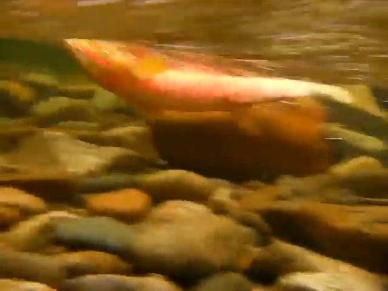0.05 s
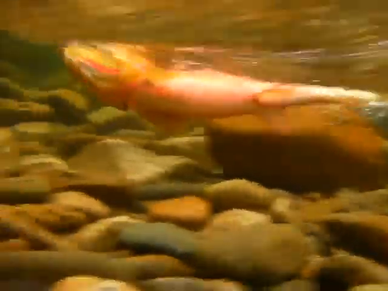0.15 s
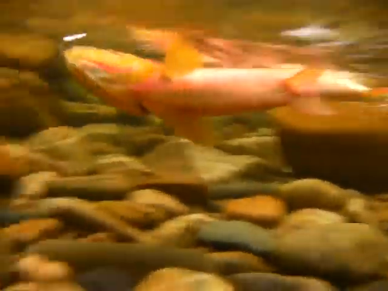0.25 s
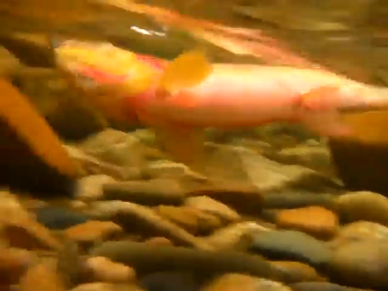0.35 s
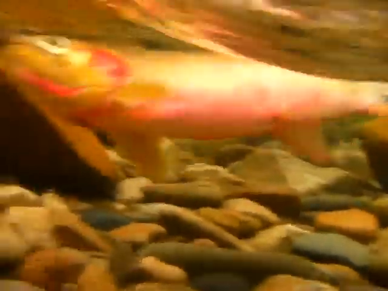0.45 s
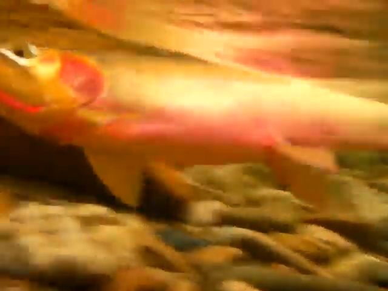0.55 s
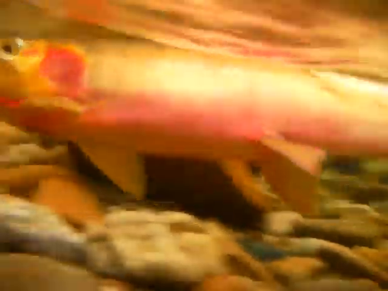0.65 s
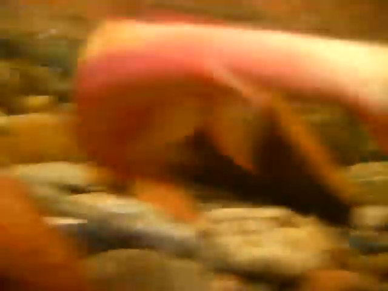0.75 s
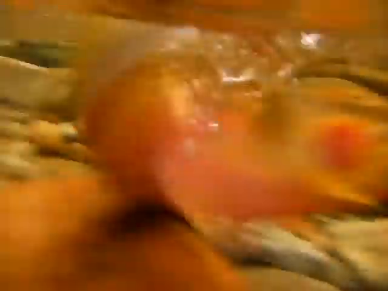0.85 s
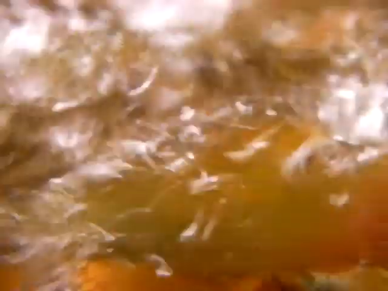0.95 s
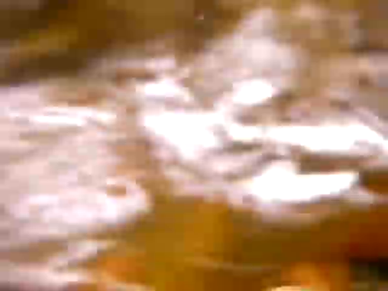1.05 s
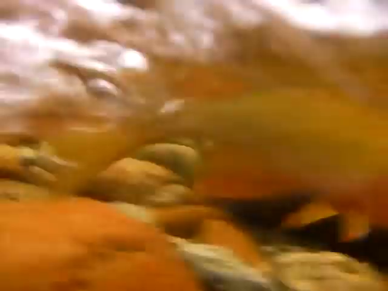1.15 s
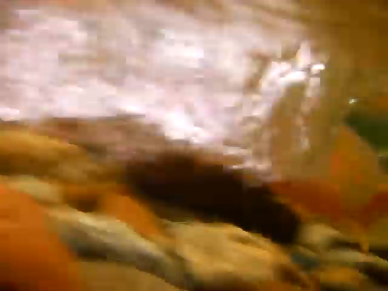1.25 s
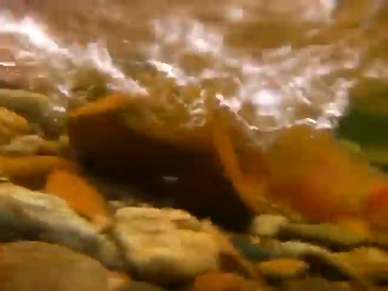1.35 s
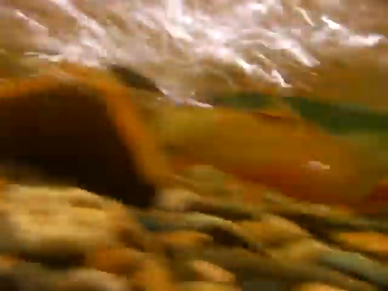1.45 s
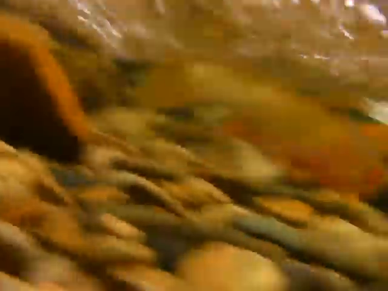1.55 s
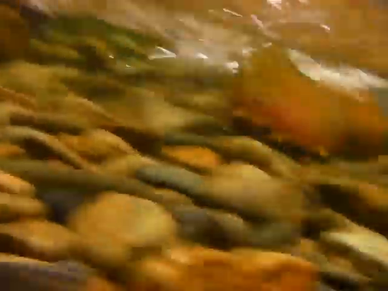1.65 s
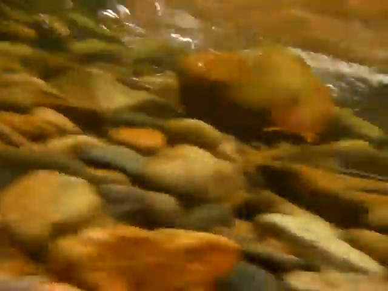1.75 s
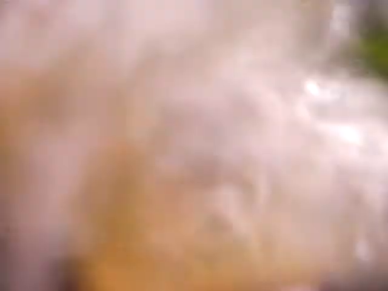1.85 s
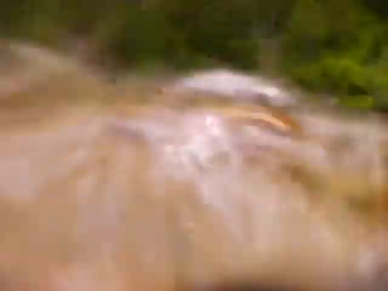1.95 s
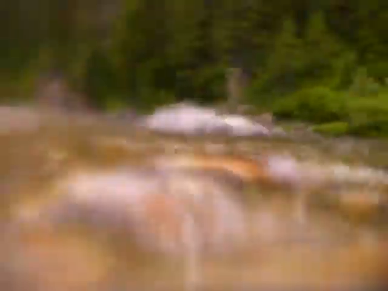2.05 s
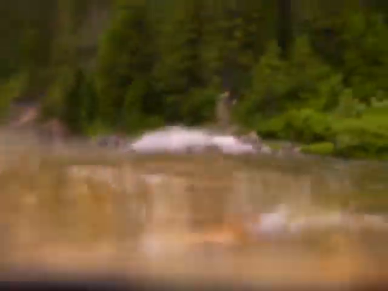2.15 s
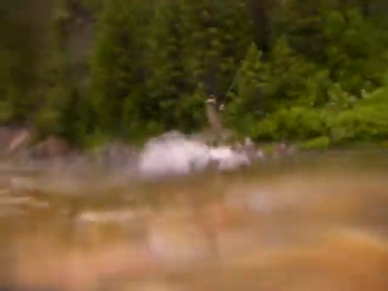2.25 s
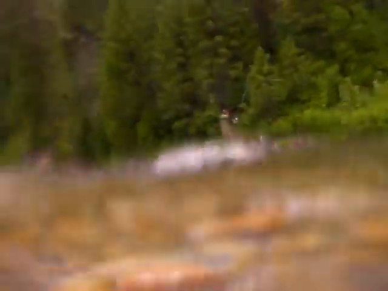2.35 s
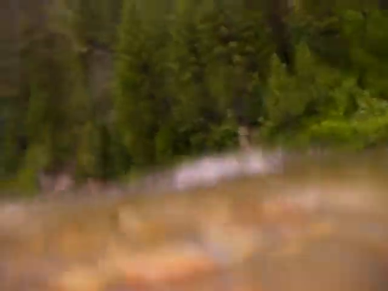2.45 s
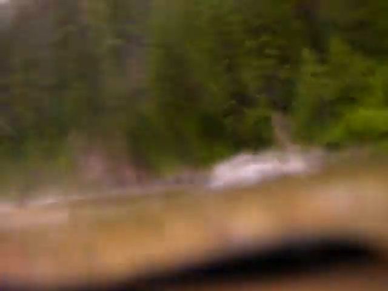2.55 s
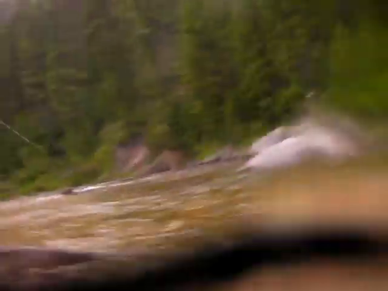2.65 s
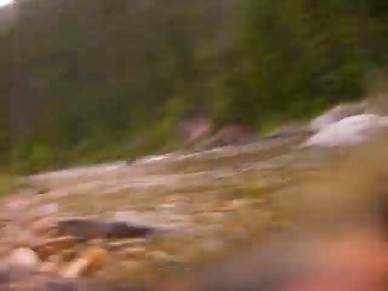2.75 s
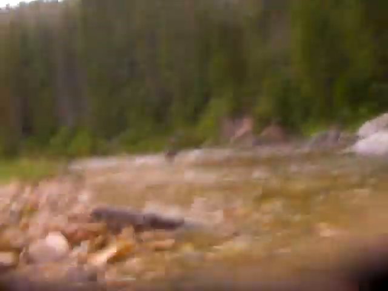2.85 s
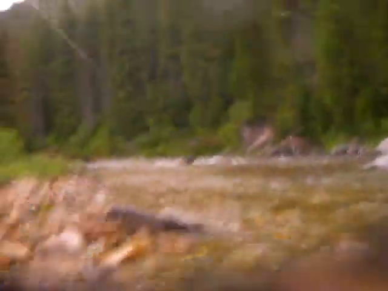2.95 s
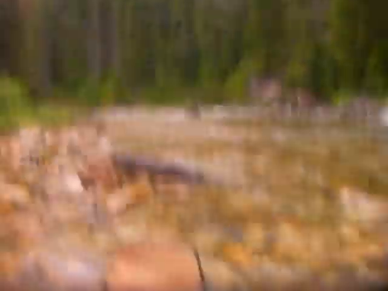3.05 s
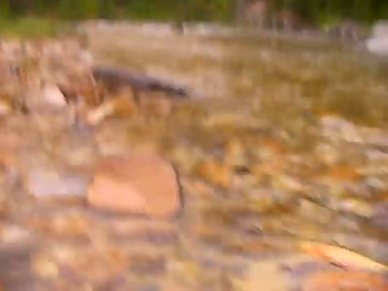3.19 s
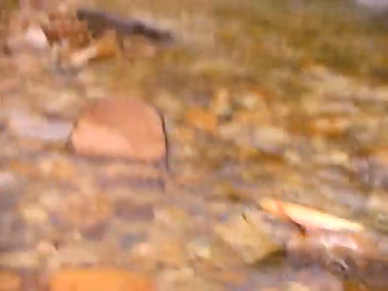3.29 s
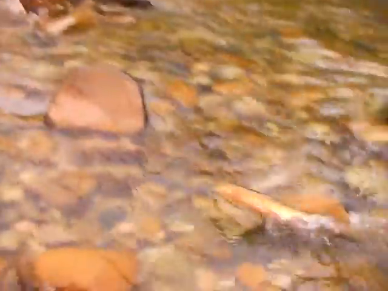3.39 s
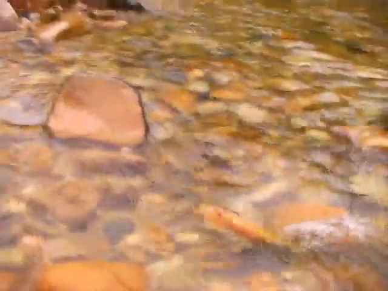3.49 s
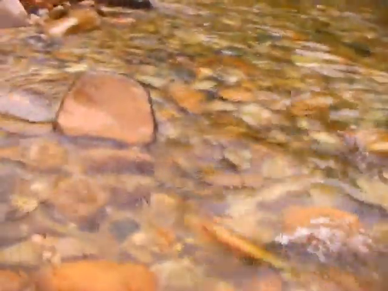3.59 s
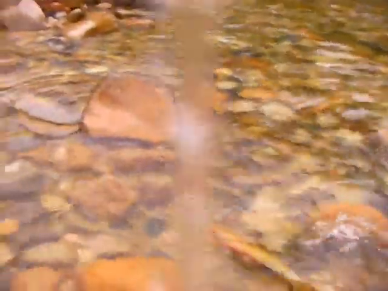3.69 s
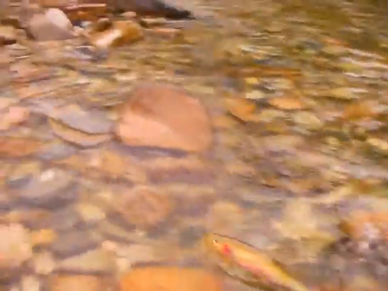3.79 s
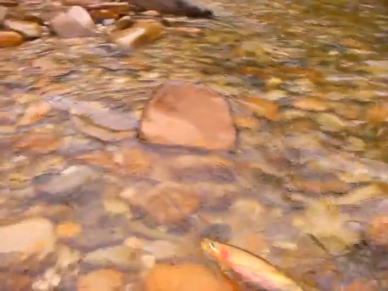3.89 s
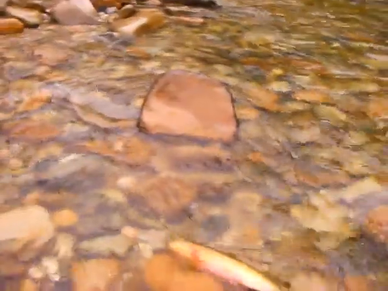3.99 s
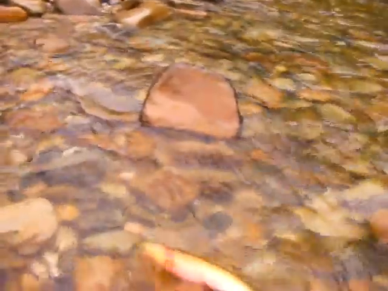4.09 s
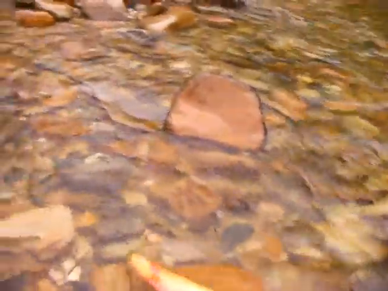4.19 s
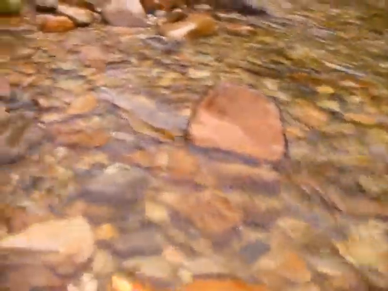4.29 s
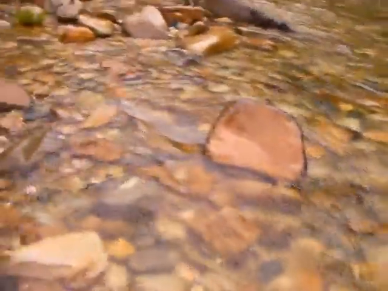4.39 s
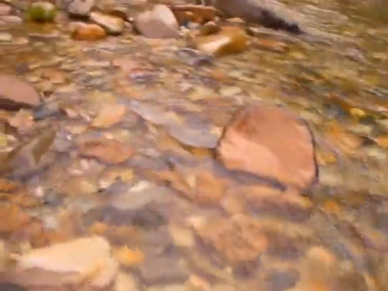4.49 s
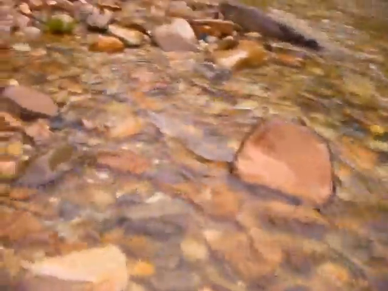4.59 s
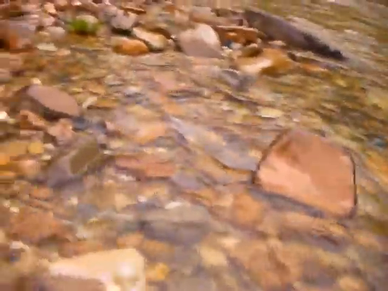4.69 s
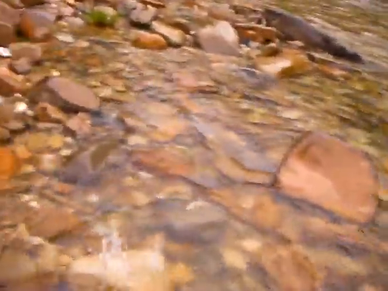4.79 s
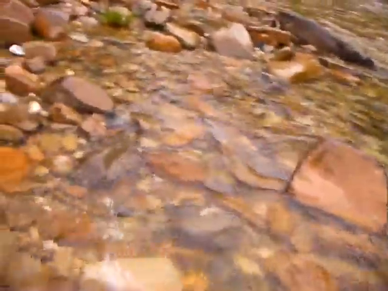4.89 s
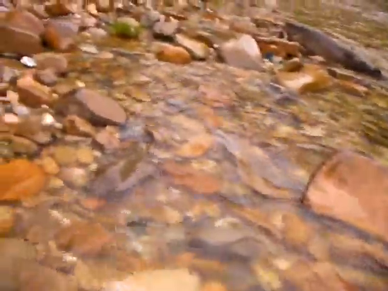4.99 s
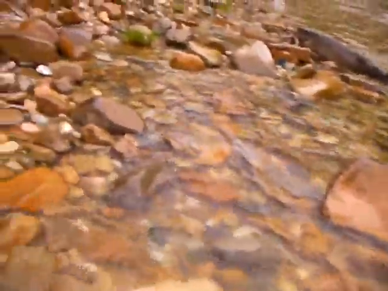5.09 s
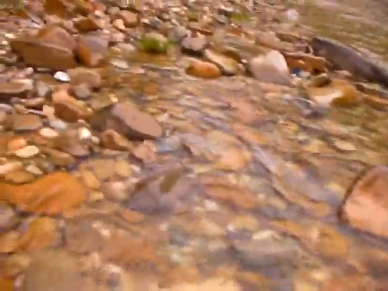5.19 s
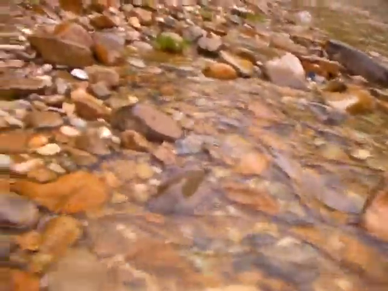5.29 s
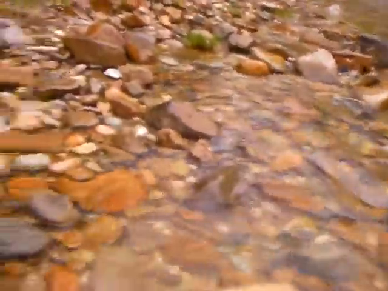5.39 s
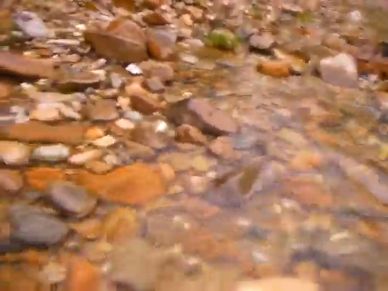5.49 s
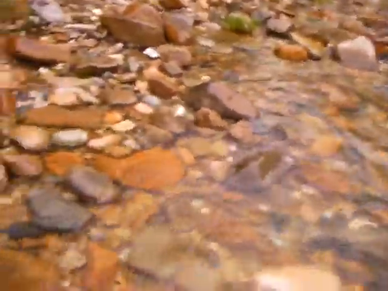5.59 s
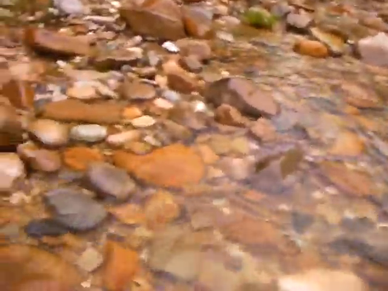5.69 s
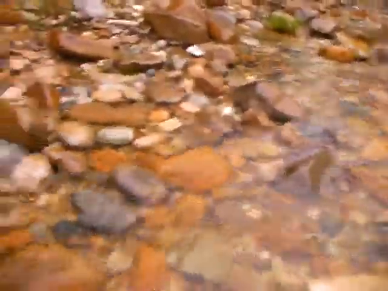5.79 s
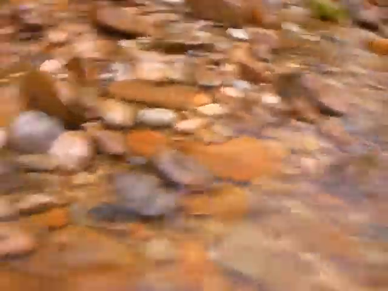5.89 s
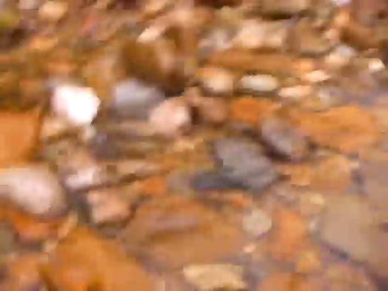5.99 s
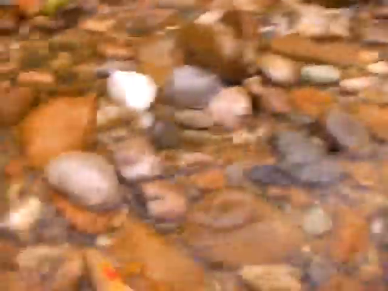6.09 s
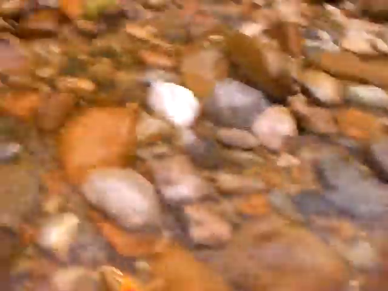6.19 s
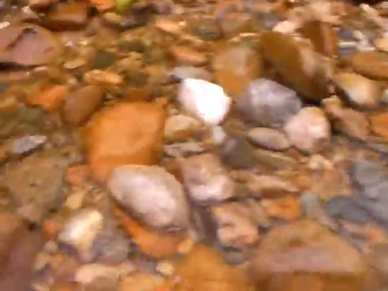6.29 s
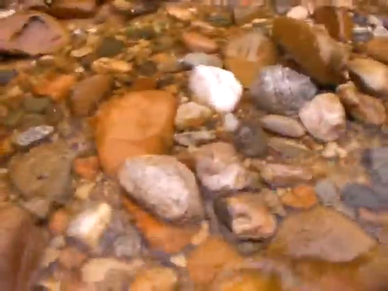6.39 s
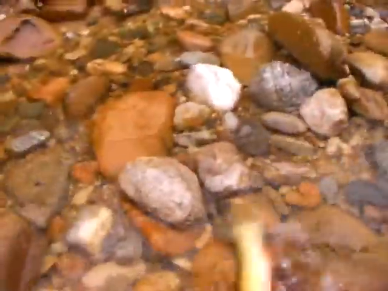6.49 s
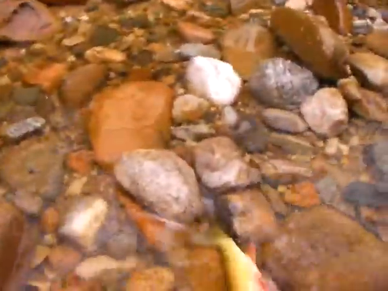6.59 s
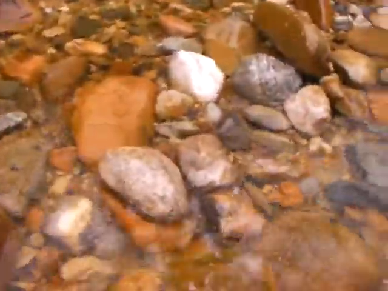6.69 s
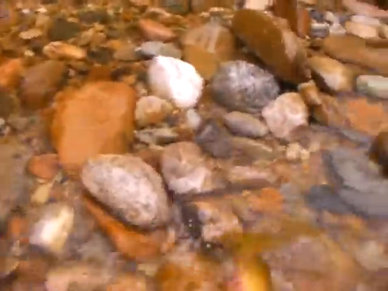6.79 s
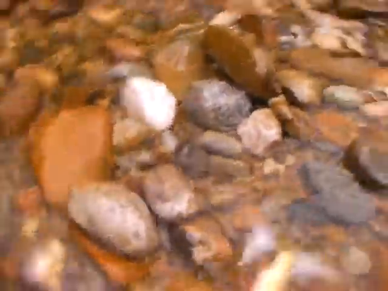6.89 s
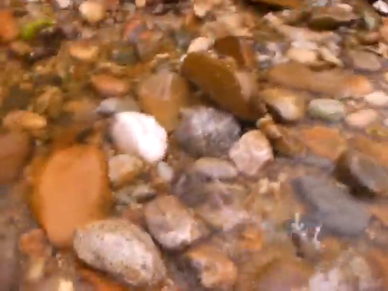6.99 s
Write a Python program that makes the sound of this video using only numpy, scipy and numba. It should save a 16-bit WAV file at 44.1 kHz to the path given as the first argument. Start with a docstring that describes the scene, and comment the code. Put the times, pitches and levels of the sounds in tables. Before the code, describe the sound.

From 0 to about 1.9 seconds the microphone is submerged in a shallow gravel creek. Loud, irregular hollow gulps near 500 Hz come many times a second, with low thumps on the case, booming bubbles and short rising blips; the water grows rougher and more crackly after 1 second, with a hard burst near 1.1 and dense glugging until 1.85. Then it drops abruptly to almost nothing. From 2.0 to 2.3 a faint muffled gurgle surfaces into a quiet, steady riffle. Between 2.3 and 3.7 the left side sweeps from dull and resonant to bright and hissy; the right stays muffled. Drips tick at 2.7 and 3.2, bubbles plop around 3.3, and a bump and brief dip come near 3.6. Gentle wavelets wash over stones around 4 to 4.8, then ease. From 6.0 to 7.1 closer splashes, short gurgles, plops and crisp droplets return over the trickling.

```python
"""Creek, from under water to air

A small waterproof camera sits under a shallow gravel creek, then is lifted out and held over the riffle.
Submerged, a trapped air pocket gulps and thumps near 500 Hz among a booming swarm of bubbles.
In air the left microphone port drains: its resonant low-pass slides up until the hiss of spray comes through.
The right port stays wet, a fixed low-pass that passes only a dull babble."""
import sys
import numpy as np
from scipy import signal
from scipy.fft import rfft, irfft
from scipy.io import wavfile
from scipy.ndimage import uniform_filter1d
from numba import njit

SR = 44100
rng = np.random.default_rng(int(sys.argv[2]) if len(sys.argv) > 2 else 0)


def persist_wave(psi):
    """Save psi, clipped to +-1, as 16-bit WAV."""
    counts = np.round(np.clip(psi, -1, 1) * 32767).astype(np.int16)
    wavfile.write(sys.argv[1], SR, np.atleast_2d(counts).T)


N = 310625
TIME = np.arange(N) / SR

# strength of the current on the submerged case: (time [s], level [dB])
CURRENT = [(0, -22.5), (.26, -22), (.58, -15.5), (.82, -15.5), (.93, -28), (.99, -14), (1.17, -18),
           (1.43, -7), (1.6, -12), (1.84, -18), (1.92, -39.5)]
# largest air pocket as it swells and shrinks: (time [s], resonance [Hz], thump on the case [dB])
AIR_POCKET = [(0, 555, -17.5), (.95, 475, -15.5), (1.28, 464, -8.5), (1.46, 294, -31), (1.57, 402, -47),
              (1.72, 490, -10.5), (1.87, 514, -17.5)]

EMERGING_S, UNDER_END_S = CURRENT[-2][0], CURRENT[-1][0]
SURFACE_S, DRY_S = 2.304, 3.7  # ports at the surface; last film gone from the left port


def undb(db):
    """Decibels to gain."""
    return 10 ** (np.asarray(db) / 20)


def unit(x):
    """Scale to rms 1."""
    return x / np.sqrt(np.mean(x ** 2))


def curves(table):
    """Each column of a table as a line through time."""
    s, *columns = np.transpose(table)
    return [np.interp(TIME, s, c) for c in columns]


def colour(x, points):
    """Minimum-phase filter with the given (Hz, dB) response, made by folding the cepstrum."""
    hz, db = np.transpose(points)
    size = 4096
    bin_hz = np.arange(size // 2 + 1) * SR / size
    bin_db = np.interp(np.log(bin_hz + 1), np.log(hz), db)
    cepstrum = irfft(np.log(undb(bin_db)))
    cepstrum[1:size // 2] *= 2
    cepstrum[size // 2 + 1:] = 0
    return signal.fftconvolve(x, irfft(np.exp(rfft(cepstrum))))[:N]


def walk(rate_hz):
    """Random levels 1 / rate_hz apart, joined by ramps; rms 1."""
    k = max(int(SR / rate_hz), 2)
    held = np.repeat(rng.standard_normal(N // k + 1), k)[:N]
    return unit(uniform_filter1d(held, k))


def add(track, s, sound):
    """Mix a sound into a track at time s."""
    start = max(int(s * SR), 0)
    track[..., start:start + sound.shape[-1]] += sound[..., :N - start]


def sine(hz):
    """A sine that follows a moving pitch."""
    return np.sin(2 * np.pi * np.cumsum(hz) / SR)


@njit
def port(x, hz, width, leak):
    """A film of water on a port: a resonant low-pass, with some treble leaking past it."""
    y, band_state, low_state = np.empty(len(x)), 0., 0.
    for i in range(len(x)):
        g, k = np.tan(np.pi * hz[i] / SR), width[i]
        band = (band_state + g * (x[i] - low_state)) / (1 + g * (g + k))
        low = low_state + g * band
        band_state, low_state = 2 * band - band_state, 2 * low - low_state
        high = x[i] - k * band - low
        y[i] = low - leak[i] * high
    return y


@njit
def ring(starts, hz, cycles, sizes, glide):
    """Sines that swell for a moment, then die away as their pitch rises."""
    y = np.zeros(N)
    for j in range(len(starts)):
        n = int(cycles[j] * SR / hz[j]) + 2
        w = 2 * np.pi * hz[j] / SR
        z, step, bend = sizes[j] + 0j, np.exp(1j * w - 8 / n), np.exp(1j * w * glide / n)
        for i in range(min(n, N - starts[j])):
            y[starts[j] + i] += z.imag * min(6 * i / n, 1.) ** 2
            z *= step
            step *= bend
    return y


def bubbles(per_s, low_hz, high_hz, cycles, spread_db, glide):
    """A swarm of ringing bubbles, many small and a few big, spread between two pitches; rms 1."""
    when, pitch, damping, size = rng.random((int(per_s * N / SR), 4)).T
    hz = low_hz * (high_hz / low_hz) ** pitch
    sizes = undb(-spread_db * np.log(size + .01)) * hz
    starts = (when * N).astype(np.int64)
    return unit(ring(starts, hz, cycles * (.5 + damping), sizes, float(glide)))


def gulps(attack_s=0.0034, hold_s=0.00574, t60_s=.036, waver=0.0442, flutter_db=3.5, twist_rad=0.38,
          crackle_db=3, froth=0.35, gulp_db=-.5, thump_apart=0.26,
          tear_rise_s=0.0058, tear_fall_s=0.0059, tear_lag_s=0.0036):
    """The air pocket rings each time the current shakes it, thumps the case and crackles as it tears."""
    # crackle spectrum: (frequency [Hz], level [dB])
    crackle_response = [(300, -25.5), (900, 7.5), (1400, 7), (2200, -5.5), (4000, -12.5), (6500, -18.5),
                        (9000, -21), (16000, -39.5)]
    thump_response = [(20, -9), (60, 8), (110, 10.5), (200, -17), (300, -16.5), (900, -61.5)]
    # the tiny floor rests the pitch at 500 Hz
    shake, shake_hz, tear = np.full(N, 1e-12), np.full(N, 500e-12), np.zeros(N)
    t = np.arange(SR // 8) / SR
    attack = np.sin(np.minimum(t / attack_s, 1) * np.pi / 2) ** 2
    swell = attack * undb(-60 * np.maximum(t - hold_s, 0) / t60_s)
    for s, db, hz, crack_db in gulp_train():
        power = (undb(db) * swell) ** 2
        add(shake, s - attack_s / 2, power)
        add(shake_hz, s - attack_s / 2, power * hz)
        start = max(s - .04, 0)
        age = t + start - s - tear_lag_s
        add(tear, start, undb(crack_db) * np.exp(np.minimum(age / tear_rise_s, -age / tear_fall_s)))
    # one pocket: overlapping gulps pull the same note, at a slightly different phase per port
    phase = 2 * np.pi * np.cumsum(shake_hz / shake * (1 + waver * walk(170))) / SR
    note = np.array([undb(gulp_db + flutter_db * walk(110)) * np.sin(phase + twist_rad * walk(60))
                     for _ in range(2)])
    thump_db = curves(AIR_POCKET)[1]
    push = rng.standard_normal(N) + thump_apart * rng.standard_normal((2, N))
    thump = np.array([unit(colour(p, thump_response)) for p in push])
    crackle = []
    for _ in range(2):
        grains = bubbles(2500, 330, 14000, 0.8, 3.5, 0) + froth * rng.standard_normal(N)
        crackle.append(unit(colour(grains, crackle_response)))
    return np.sqrt(shake) * (note + undb(thump_db) * thump) + undb(crackle_db) * tear * np.array(crackle)


def gulp_train(gap_s=0.017, fade_db=1.5, scatter=.04):
    """Every gulp (s, dB, Hz, crackle dB); within a run each is weaker, its pitch a little off the first."""
    # runs of gulps: (time [s], gulps in the run, level [dB], pitch [Hz], crackle [dB])
    runs = [(0.0, 2, -6, 545, -30), (0.057, 1, -1.5, 524, -28.5), (.118, 2, -7, 546, -69),
            (.214, 1, -2.5, 548, -49.5), (.324, 1, -8, 493, -63), (.388, 1, -12.5, 497.2, -65),
            (.416, 1, -7, 515, -45), (0.436, 1, 2, 489, -33), (0.495, 2, -10.5, 520, -60),
            (.6, 1, -3, 541.5, -29), (0.617, 1, -1, 625, -36), (.727, 1, 0.5, 483, -28.5),
            (0.786, 1, -1, 515, -20.5), (0.878, 1, 0.5, 543, -20), (.954, 1, -5.5, 540, -49.5),
            (0.987, 2, -4.5, 429.7, -29.5), (1.031, 1, -2.5, 466, -26), (1.061, 2, -4.5, 548.3, -25),
            (1.104, 1, 0.5, 489.4, -11.5), (1.128, 1, -4, 528.6, -23), (1.179, 1, -10, 447, -49),
            (1.205, 3, -1.5, 515, -24), (1.322, 1, -8, 398.4, -16.5), (1.355, 4, 0, 445, -22),
            (1.457, 1, -9, 470.2, -34), (1.515, 2, -1, 525, -22), (1.563, 3, -1.5, 450, -28),
            (1.633, 2, -1.5, 430, -25), (1.693, 2, -5, 500, -27), (1.774, 2, -2.5, 510, -25),
            (1.833, 1, -10, 482, -25)]
    for s, count, db, hz, crack_db in runs:
        for k, chance in enumerate(rng.standard_normal(8)[:round(count)]):
            gulp_hz = hz * (1 + scatter * chance * min(k, 1))
            yield s + k * gap_s, db - k * fade_db, gulp_hz, crack_db - k * fade_db


def churn(churn_db=-5.5, apart_db=-7, pocket_width=0.27, chirp_db=-27, case_hz=190, case_db=-42, surge_db=4.5):
    """The current tumbles over the case: a swarm of bubbles booms in the moving pocket, the case rings low."""
    # underwater swarm spectrum: (frequency [Hz], level [dB])
    submerged = [(25, -18.5), (90, -2.5), (190, 2), (255, -17.5), (400, 4.5), (600, 2.5), (820, -9),
                 (1300, -8), (1900, -23), (3500, -20.5), (8000, -36), (16000, -64.5)]
    level_db = curves(CURRENT + [(2.05, -102.5)])[0] + surge_db * surges()
    pocket_hz, steady = curves(AIR_POCKET)[0], np.ones(N)
    swarms = []
    for _ in range(2):
        swarm = bubbles(800, 150, 2400, 18, 2.8, .2) + .6 * rng.standard_normal(N)
        swarms.append(unit(port(colour(swarm, submerged), pocket_hz, pocket_width * steady, steady)))
    mid, side = swarms
    boom = undb(churn_db) * (mid + undb(apart_db) * side * np.array([[1], [-1]]))
    chirps = bubbles(40, 800, 1500, 40, 2.0, .25)
    case_response = [(case_hz / 2, -30), (case_hz * .88, -12), (case_hz, 0), (case_hz * 1.14, -14),
                     (case_hz * 2, -60), (case_hz * 8, -100)]
    hum = unit(colour(rng.standard_normal(N), case_response))
    under = np.clip((1.9 - TIME) * 10, 0, 1)
    return undb(level_db) * (boom + undb(chirp_db) * chirps) + undb(case_db) * hum * under


def surges(width_s=0.027):
    """Nearness to a gulp, 0-1: the churning swells round every gulp and slackens between them."""
    near, t = np.zeros(N), np.arange(-SR // 10, SR // 10) / SR
    for s, db, _, _ in gulp_train():
        bump = undb(db) * np.exp(-(t / width_s) ** 2)
        add(near, s + t[0], bump[t >= -s])
    return np.tanh(near)


def single_bubbles(attack=0.11, rise_octaves=0.11):
    """Big bubbles pinch off, each with a short rising note; attack and rise are per t60."""
    # biggest bubbles: (time [s], level [dB], starting pitch [Hz], t60 [s], left minus right [dB])
    big = [(.203, -16.5, 1204, 0.024, 16), (.242, -31.5, 1410, 0.02, 15.5), (.413, -25.5, 1820, 0.02, 13),
           (0.501, -11, 910, 0.037, 2), (0.52, -16.5, 1080, 0.062, 8), (.552, -8, 1280, 0.022, 14),
           (.68, -27, 1750, 0.025, 9), (1.058, -8, 860, 0.026, 2), (1.102, -12, 2330, .013, 8),
           (1.287, -15, 1273, 0.027, 12), (1.308, -11, 1350, 0.024, 14), (1.667, -14.5, 1257, .024, 6),
           (2.115, -25, 1070, 0.02, 9), (2.265, -27.5, 600, 0.045, 0), (3.226, -16.5, 883, 0.017, -12),
           (3.303, -9.5, 795, 0.021, -14.5), (3.584, -15.5, 430, 0.013, 31.5),
           (4.236, -19.5, 464, 0.05, -1), (4.551, -20.5, 1216, .022, -5), (4.606, -22, 458, .057, -1),
           (4.704, -14.5, 753, 0.023, -8), (4.78, -19.5, 760, 0.039, -8), (6.188, -20, 846, 0.018, -17),
           (6.448, -18.5, 753, 0.027, -10), (6.785, -20.5, 812, 0.049, -11), (6.919, -13, 1190, 0.013, -6)]
    out = np.zeros((2, N))
    for s, db, hz, t60_s, pan_db in big:
        u = np.arange(int(t60_s * SR)) / SR / t60_s
        swell = np.minimum(u / attack, 1) * undb(-60 * np.maximum(u - attack, 0))
        note = swell * sine(hz * 2 ** (rise_octaves * u))
        add(out, s, undb(db + np.array([[pan_db], [-pan_db]]) / 2) * note)
    return out


def drops(drop_db=-4, splat=0.72, wet_port_db=-26, attack=0.14, wobble=0.096):
    """Close droplets: a tiny unsteady ring inside a noise splat, mostly on the open port."""
    # closest droplets: (time [s], level before drop_db [dB], pitch [Hz], t60 [s])
    close = [(2.176, -15.5, 2600, 0.0038), (2.818, -14, 2720, 0.017), (2.673, 1.5, 4930, 0.01),
             (3.047, -2.5, 6600, 0.013), (3.2, -9, 4600, 0.0067), (3.226, 1, 1780, 0.004),
             (3.463, -16, 13700, .0036), (3.583, 1, 1690, 0.0023), (4.549, -13, 3000, 0.017),
             (4.681, -5, 10200, 0.0021), (4.729, -4.5, 5340, 0.012), (5.852, -10, 2520, 0.0078),
             (5.68, -11, 6530, 0.013), (6.026, -2.5, 6380, 0.025), (6.084, 2, 6970, 0.0026),
             (6.188, -3, 1710, 0.0064), (6.511, 1, 6170, 0.015), (6.651, -7, 6860, 0.096),
             (6.69, -1, 4500, 0.0065), (6.914, 3.5, 3994, 0.033)]
    splat_response = [(300, -54), (1500, -1.5), (7000, 3), (16000, -13.5)]
    out, noise = np.zeros((2, N)), colour(rng.standard_normal(N), splat_response)
    leak_db, unsteady = drain()[2], 1 + wobble * walk(1500)
    for s, db, hz, t60_s in close:
        u, start = np.arange(int(t60_s * SR)) / SR / t60_s, int(s * SR)
        span = slice(start, start + len(u))
        tick = 0.72 * sine(hz * unsteady[span]) + splat * undb(leak_db[start] / 2) * noise[span]
        swell = np.minimum(u / attack, 1) ** 2 * undb(-60 * np.maximum(u - attack, 0))
        add(out, s, undb(db + drop_db) * swell * tick * undb([[0], [wet_port_db]]))
    return out


def creek(left_db=-1, right_db=-2.5, spray_db=-7, apart=0.19, right_spray_db=-3, slosh_db=2,
          wet_port_hz=1163, wet_port_width=0.66, wet_leak_db=-30.0, left_port_db=-2.5,
          dip_s=3.597, dip_depth_db=-17.5, dip_recovery_s=0.033):
    """The creek through the draining left port and the wet right one; its level dips briefly once."""
    babble, mist = wavelets() * undb(slosh_db * walk(7.5))
    babble, mist = np.hypot(flow(), babble), undb(spray_db) * mist
    shared, side, glugs = riffle(), apart * riffle(), gurgles()
    at_left = undb(left_db) * babble * (shared + side) + spray(mist) + glugs
    at_right = undb(right_db) * babble * (shared - side) + undb(right_spray_db) * spray(mist) + glugs
    hz, width, leak_db = drain()
    steady = np.ones(N)
    left = port(at_left, hz, width, undb(leak_db)) * undb(left_port_db)
    right = port(at_right, wet_port_hz * steady, wet_port_width * steady, undb(wet_leak_db) * steady)
    dip_db = dip_depth_db * (TIME > dip_s) * np.exp(-np.abs(TIME - dip_s) / dip_recovery_s)
    return np.array([left, right]) * undb(dip_db)


def gurgles(rough=0.11):
    """A cavity's note falls as it opens in the surface and rises as it closes."""
    # cavities: (time [s], length [s], level [dB], first pitch [Hz], last pitch [Hz])
    cavities = [(1.919, 0.088, -38.5, 838, 1780), (2.081, 0.051, -36.5, 950, 1365),
                (6.027, 0.04, -18, 965, 391), (6.124, 0.017, -20, 398, 720), (6.281, 0.044, -19, 456, 880),
                (6.321, 0.0075, -19.5, 410, 485)]
    out = np.zeros(N)
    for s, length_s, db, first_hz, last_hz in cavities:
        u = np.linspace(0, 1, int(length_s * SR))
        hz = first_hz * (last_hz / first_hz) ** u * (1 + rough * walk(390)[:len(u)])
        add(out, s, undb(db) * np.sqrt(4 * u * (1 - u)) * sine(hz))
    return out


def spray(near, mist_db=-3, tick_db=-41, flurry_db=3.5):
    """Tiny drops and bursting bubbles patter; as the port dries, lone ones tick close by, even in lulls."""
    # splash spectrum: (frequency [Hz], level [dB])
    splash = [(300, -28), (900, -17.5), (2000, -1), (4000, -1), (7000, 0), (10000, -2.5), (16000, -4.5)]
    patter = bubbles(1800, 1200, 15000, 14, 4.0, .1) + undb(mist_db) * rng.standard_normal(N)
    flurry = undb(flurry_db * walk(60))
    ticks = bubbles(28, 2500, 15000, 22, 3.1, .1) * dryness()
    return near * unit(colour(patter * flurry, splash)) + undb(tick_db) * ticks


def wavelets(rise_s=0.033, babble_t60_s=0.69, spray_t60_s=0.57):
    """Gains of babble and spray: each wavelet rises, washes over the stones and ebbs, the spray sooner."""
    # wavelets on the near stones: (time [s], length [s], babble level [dB], spray level [dB])
    breaking = [(3.4, 0.12, -33.5, -27.5), (3.915, 0.27, -26.5, -44), (4.064, 0.22, -44, -22.5),
                (4.205, 0.05, -24.5, -19), (4.34, 0.58, -33, -27.5), (4.684, 0.024, -30.5, -17.5),
                (5.698, 0.083, -38, -24.5), (5.991, 0.042, -26, -12.5), (6.272, 0.44, -29.5, -15),
                (6.743, .33, -33, -17.5)]
    babble, mist = np.zeros(N), np.full(N, 1e-6)
    for s, length_s, babble_db, spray_db in breaking:
        rise = np.clip((TIME - s) / rise_s, 0, 1) ** 2
        ebb_s = np.maximum(TIME - s - length_s, 0)
        babble = np.hypot(babble, rise * undb(babble_db - 60 * ebb_s / babble_t60_s))
        mist = np.hypot(mist, rise * undb(spray_db - 60 * ebb_s / spray_t60_s))
    return babble, mist


def riffle(near_db=-9, fizz_db=-3, plink_db=-13):
    """Water over gravel: a smooth far rush, with bubbles, fizz and lone plinks from the nearer stones."""
    # riffle spectrum: (frequency [Hz], level [dB])
    gravel = [(20, -48.5), (45, -32.5), (110, -19), (180, -8.5), (255, -23.5), (320, -7.5), (400, 1),
              (560, -2), (800, -0.5), (1100, -6.5), (2000, -8), (4000, -12.5), (7000, -15.5), (16000, -22)]
    rush = rng.standard_normal(N) * undb(1.0 * walk(12))
    babble = bubbles(650, 330, 2200, 18, 3.2, .25)
    fizz = bubbles(1500, 1800, 14000, 13, 4.6, .1)
    plinks = bubbles(30, 1200, 7000, 40, 3.5, .15)
    mix = rush + undb(near_db) * babble + undb(fizz_db) * fizz + undb(plink_db) * plinks
    return unit(colour(mix, gravel))


def flow(flow_db=-30.5, emerge_s=0.29, submerged_db=-14, near_surface_db=2, lift_s=0.43):
    """Gain of the steady riffle: near silent in the deep, rising to the surface, easing as the camera lifts."""
    knots_s = [EMERGING_S, UNDER_END_S, SURFACE_S - emerge_s, SURFACE_S]
    emerge_db = np.interp(TIME, knots_s, [-70, submerged_db, submerged_db, 0])
    near_db = near_surface_db * np.exp(-np.maximum(TIME - SURFACE_S, 0) / lift_s)
    return undb(flow_db + emerge_db + near_db)


def drain(tremble=.02, open_hz=7410, half_drained_s=2.428, drain_time_s=0.24, film_width=0.12, dry_width=0.89,
          flooded_width=0.51, film_leak_db=-38.5, dry_leak_db=-4.5):
    """The left port as it empties and dries: resonance Hz (an S-curve), relative width, treble leak dB."""
    dry = dryness()
    hz = open_hz / (1 + np.exp(-(np.maximum(TIME, UNDER_END_S) - half_drained_s) / drain_time_s))
    flooded = np.clip((SURFACE_S - TIME) * 20, 0, 1)  # covering water damps the resonance
    width = film_width * (dry_width / film_width) ** dry + flooded_width * flooded
    leak_db = film_leak_db + dry * (dry_leak_db - film_leak_db)
    return hz * (1 + tremble * (1 - dry) * walk(25.28)), width, leak_db


def dryness():
    """How far the left port has dried, 0-1."""
    return np.clip((TIME - SURFACE_S) / (DRY_S - SURFACE_S), 0, 1)


def nudges(nudge_db=-5):
    """Water and grip nudge the case: soft low bumps that reach both ports."""
    # nudges: (time [s], length [s], level before nudge_db [dB])
    bumps = [(1.85, 0.18, -42.5), (2.036, 0.45, -35.5), (2.296, 0.79, -42.5), (3.205, 0.045, -27.5),
             (3.289, 0.041, -23), (3.564, 0.038, -17), (4.255, 0.06, -33), (5.94, 0.14, -40),
             (6.155, 0.078, -33), (6.382, 0.24, -38.5), (6.705, 0.37, -40)]
    bump_response = [(20, -8.5), (60, 1.5), (120, 4.5), (200, -3.5), (300, -9), (700, -52.0)]
    push = np.zeros(N)
    for s, length_s, db in bumps:
        add(push, s, undb(db) * np.hanning(int(length_s * SR)))
    return undb(nudge_db) * push * unit(colour(rng.standard_normal(N), bump_response))


def scene():
    """Under the water, then above it; the case colours the treble of everything."""
    # treble response of the case: (frequency [Hz], gain [dB])
    case = [(6800, 0.5), (7450, -2), (7950, -19.5), (8150, -13), (8600, -8), (9600, -0.5), (11500, -2),
            (13500, 8.5), (16000, 2.5)]
    water = gulps() + churn() + single_bubbles() + drops() + creek() + nudges()
    return np.array([colour(channel, case) for channel in water])


def record(dry, top_hz=15900):
    """The camera clips the loudest peaks and cuts the top."""
    low_pass = signal.ellip(10, .2, 70, top_hz, fs=SR, output="sos")
    return signal.sosfilt(low_pass, np.clip(dry, -1, 1))


dry = scene()
out = record(dry)
persist_wave(out)
```